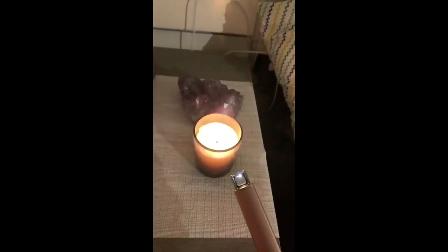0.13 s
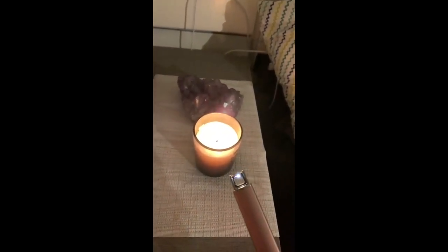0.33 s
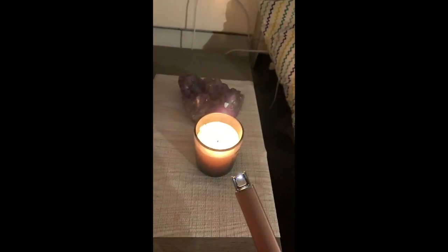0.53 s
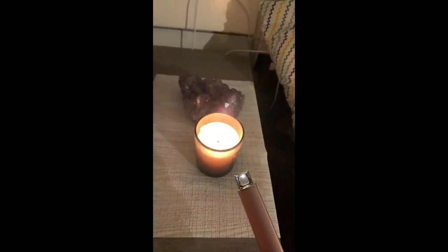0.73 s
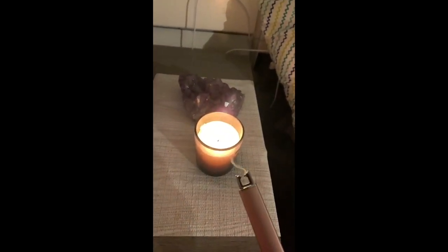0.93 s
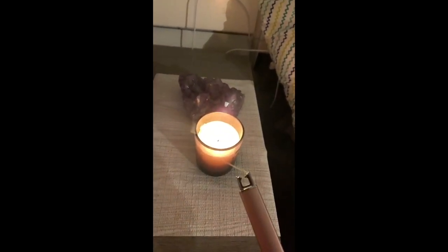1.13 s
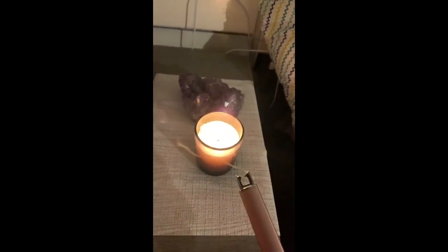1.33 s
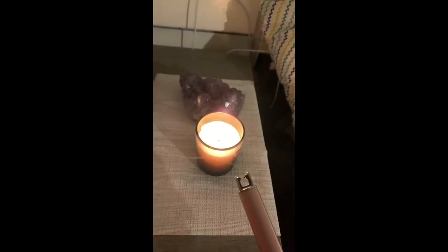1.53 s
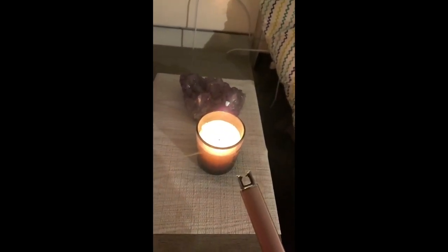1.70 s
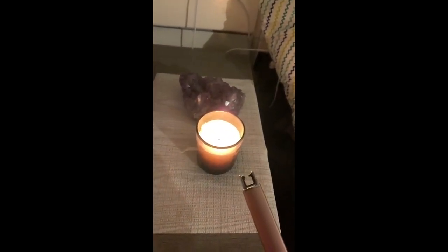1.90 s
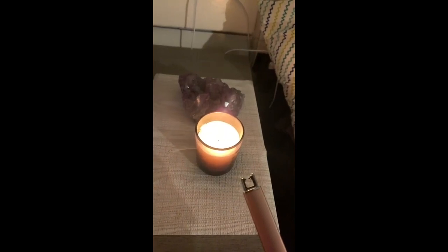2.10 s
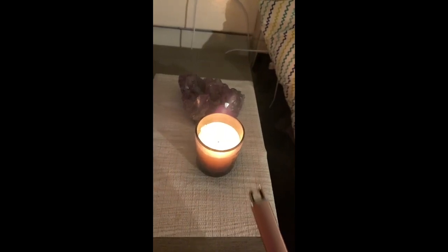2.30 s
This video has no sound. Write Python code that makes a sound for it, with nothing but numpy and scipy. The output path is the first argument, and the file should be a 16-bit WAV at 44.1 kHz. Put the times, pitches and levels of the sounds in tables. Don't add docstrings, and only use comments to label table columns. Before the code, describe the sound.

An electric arc lighter, heard close. Near silence with faint low rumble until a crisp, bright switch click at 0.15 s. The arc strikes at once, stutters weakly, then from 0.25 s spits in irregular crackles, growing stronger and denser from about 0.5 s. At 0.9 s a slightly duller release click cuts it off, with a short, soft small-room tail. Only quiet rumble and faint hum and hiss remain until about 2.4 s.

```python
import sys
import numpy as np
from scipy import signal
from scipy.fft import rfft, irfft, next_fast_len
from scipy.io import wavfile
from scipy.ndimage import uniform_filter1d

SR = 44100
rng = np.random.default_rng(int(sys.argv[2]) if len(sys.argv) > 2 else 0)


def file_out(sig):
    cols = np.atleast_2d(sig).T
    lim = np.clip(cols, -1, 1)
    pcm = np.round(lim * 32767).astype(np.int16)
    wavfile.write(sys.argv[1], SR, pcm)


def nominal_scale(level):
    x = np.asarray(level, float) / 20
    return 10 ** x


N = 103635

# start_s, level_db, spark_rate_khz
ARC_CURRENT = [
    (0.158, -55.5, 6),
    (.19, -57, 6),
    (0.243, -48.5, 6),
    (0.269, -42.5, 4),
    (0.448, -43.5, 3),
    (0.549, -39, 4),
    (0.642, -38.5, 5),
    (0.666, -42.5, 5),
    (.69, -39.5, 5),
    (0.899, -42, 5),
]
# start_s, peak_db
STRIKE_SPARKS = [
    (.1582, -19),
    (.172, -40),
    (.1768, -40),
    (.191, -38),
    (.1952, -40),
    (.1976, -38),
    (.2147, -33),
    (.2153, -29),
    (.2226, -39),
]
# start_s, peak_db, length_s
ARC_JUMPS = [(0.265, -33.5, 0.0098), (0.466, -32, 0.0067), (0.489, -24, 0.0033), (0.533, -25, 0.0034),
             (0.545, -31, 0.015), (0.562, -28.5, 0.0089), (0.6, -67, 0.0028), (0.625, -26, .008),
             (0.671, -29, 0.014), (.693, -26, 0.0028), (.80, -35.5, 0.015)]
# start_s, peak_db, length_s
ARC_SPITS = [(.329, -25, .003), (.3335, -27, .0015), (.3383, -24, .002), (.3468, -26, .0005),
             (.3505, -25, .0012), (.3695, -27, .0012), (.388, -24, .001), (.3915, -29, .0005),
             (.398, -24, .0015), (.4012, -26, .0006), (.417, -25, .0015)]
# frequency_hz, gain_db
SPARK_COLOUR = [(300, -43.5), (1700, -19.5), (2400, -17), (4100, -13), (7500, -8.5), (10000, -4),
                (15900, -1.5), (16300, -29.5)]
# frequency_hz, density_db_per_hz
FIZZ_SPECTRUM = [(100, -34), (200, 3.5), (600, -4), (1500, -13), (4000, -13), (12000, -3)]
# start_s, peak_db, rattle_s, tail_db, tail_t60_s
PRESS_SNAP = [(.1459, -13, .0003, -20, 0.04)]
# start_s, peak_db, rattle_s, tail_db, tail_t60_s
RELEASE_SNAP = [(.8992, -16, .0013, -3.5, 0.01974)]
# pitch_hz, level_db, t60_s
PRESS_HANDLE = [(1550, -26, 0.0072), (3795, -24, 0.013), (5377, -28, 0.0022), (10250, -40, .006),
                (14400, -22, .003)]
# pitch_hz, level_db, t60_s
RELEASE_HANDLE = [(1461, -24.5, 0.002), (2444, -24, 0.0037), (3766, -19.5, .004), (5110, -27, 0.007),
                  (8680, -19, 0.002834), (15740, -24, .01)]
# frequency_hz, gain_db
CLOSING_CRACK = [(300, -60), (1200, -37.5), (2300, -22.5), (3600, 6), (5500, 0), (9000, -5.5),
                 (14000, -6.5), (16500, -28)]
# frequency_hz, gain_db
OPENING_CRACK = [(250, -37), (600, -19.5), (1000, -7), (4500, -6), (6300, -13.5), (9000, -13.5),
                 (14000, -33.5)]
# delay_s, gain_db
NEAR_ECHOES = [(.0002, -17), (.0007, -14), (.00124, -18), (.0018, -20), (.0025, -18)]
# frequency_hz, density_db_per_hz
ROOM_SPECTRUM = [(15, -49.5), (25, -23.5), (73, -1), (175, -21), (240, -22.5), (275, -29.5), (340, -29),
                 (818, -41.5), (14500, -55.5)]
# start_s, level_db
RUMBLE_SWELL = [(0.0, -61), (0.32, -54), (0.35, -83), (0.4, -57.5), (0.63, -54), (1.2, -64), (1.22, -58),
                (1.49, -58.5), (1.52, -54), (1.66, -69.5), (1.69, -55), (1.98, -60), (2.28, -54.5),
                (2.35, -61.5)]
# start_s, gain_db
AIR_STIR = [(0, 1.5), (1.1, -1.5), (2.17, 0.5), (2.26, 3)]
# start_s, top_hz
BAND_TOP = [(0, 14900), (.14, 14900), (.143, 16600), (.165, 16600), (.175, 15800), (.183, 15800),
            (.19, 12500), (.24, 12500), (.26, 13100), (.78, 13100), (.89, 13500), (.905, 14300),
            (.96, 14300), (.98, 14900)]
# start_s, end_s, centre_hz, width_hz
PASSED_BANDS = [
    (.25, .365, 13600, 330),
    (.605, .67, 13760, 70),
    (.875, .94, 15740, 170),
]

SPARK_SCATTER_DB, SPARK_CAP_DB, FLURRY_CAP_DB = 6, 11.5, -6.5
FLICKER_DB, FLICKER_HZ = 0.5, 198.5
FLURRY_DB, STRIKE_DB, FIZZ_DB = -6.5, 6.5, -10
NEAR_DB, NEAR_T60_S = -7.5, .025
HANDLE_CUT_HZ = 764
WALL_DB, WALL_S, WALL_SPREAD_S, WALL_HZ = -24, 0.033, 0.023, 4100
LINGER_DB, LINGER_T60_S, LINGER_HZ = -28, 0.2, 2500
ROOM_DB, HUM_HZ, HUM_DB, SWELL_DB = -60, 240, -79, .5
PORT_CUT_HZ, FRAME = 30, 1024


def arc():
    t = np.arange(N) / SR
    start_s, level_db, rate_khz = np.array(ARC_CURRENT).T
    burning = (t > start_s[0]) & (t < start_s[-1])
    current_db = np.interp(t, start_s, level_db)
    share = np.interp(t, start_s, rate_khz) * 1e3 / SR

    flicker_db = FLICKER_DB * walk(FLICKER_HZ)
    crackle = burning * nominal_scale(current_db + flicker_db) * sparks(share, SPARK_CAP_DB)
    jumps = np.zeros(N)
    for s, db, length in ARC_JUMPS + ARC_SPITS:
        jumps += nominal_scale(db + FLURRY_DB) * (t > s) * np.exp(-((t - s) / length) ** 2)
    discharge = crackle + jumps * sparks(0.054, FLURRY_CAP_DB)
    for s, db in STRIKE_SPARKS:
        discharge[int(s * SR)] += nominal_scale(db + STRIKE_DB) * 2

    discharge = discharge + scattered_hiss(discharge)
    noise = colour(rng.standard_normal(N), FIZZ_SPECTRUM)
    fizz = burning * nominal_scale(current_db / 2 - 24) * level(noise, FIZZ_DB)
    return colour(discharge, SPARK_COLOUR, causal=True) * nominal_scale(6) + fizz


def sparks(share, cap_db):
    size = nominal_scale(np.minimum(SPARK_SCATTER_DB * rng.exponential(size=N), cap_db))
    fires = rng.random(N) < share
    sign = np.sign(rng.standard_normal(N))
    return level(fires * size * sign / np.sqrt(share), 0)


def scattered_hiss(x):
    keep = np.exp(-2 * np.log(1000) / (NEAR_T60_S * SR))
    energy = signal.lfilter([0, 1 - keep], [1, -keep], x ** 2)
    return nominal_scale(NEAR_DB) * np.sqrt(energy) * rng.standard_normal(N)


def snap(event, modes, crack):
    (s, db, length, tail_db, tail_t60), = event
    t = np.arange(3000) / SR
    response = colour(1. * (t == 0), crack, causal=True)
    for hz, gain_db, t60 in modes:
        response += nominal_scale(gain_db) * np.sin(2 * np.pi * hz * t) * 1000. ** (-t / t60)

    burst = np.exp(-(t / length) ** 2)
    tail = nominal_scale(tail_db) * 1000. ** (-t / tail_t60)
    spectrum = rfft(rng.standard_normal(len(t)) * np.hypot(burst, tail))
    spectrum = spectrum / np.sqrt(uniform_filter1d(abs(spectrum) ** 2, size=41))
    rattle = irfft(spectrum, len(t)) * (t < t[-1] / 2)

    x = signal.fftconvolve(response, rattle)[:len(t)]
    high_pass = signal.butter(5, HANDLE_CUT_HZ, "high", fs=SR, output="sos")
    x = signal.sosfilt(high_pass, x)
    out, i = np.zeros(N), int(s * SR)
    out[i:i + len(t)] = x * nominal_scale(db) / abs(x).max()
    return out


def table(x):
    return x + sum(nominal_scale(db) * np.roll(x, round(s * SR)) for s, db in NEAR_ECHOES)


def walls(x):
    t = np.arange(6000) / SR
    wall = rng.standard_normal(len(t)) * np.exp(-((t - WALL_S) / WALL_SPREAD_S) ** 2)
    wall = level(colour(wall, [(WALL_HZ, 0), (15000, -10)]), WALL_DB)
    decay = (t > WALL_S / 2) * np.exp(-np.log(1000) * t / LINGER_T60_S)
    late = rng.standard_normal(len(t)) * decay
    late = level(colour(late, [(LINGER_HZ, 0), (7000, -20)]), LINGER_DB)
    return x + signal.fftconvolve(x, (wall + late) / np.sqrt(len(t)))[:N]


def room():
    t = np.arange(N) / SR
    noise = level(colour(rng.standard_normal(N), ROOM_SPECTRUM), ROOM_DB)
    low = signal.sosfiltfilt(signal.butter(2, 150, fs=SR, output="sos"), noise)
    mid = signal.sosfiltfilt(signal.butter(1, 3000, fs=SR, output="sos"), noise - low)

    hum_hz = HUM_HZ * (1 + 0.0026 * walk(11))
    hum = nominal_scale(HUM_DB) * np.sin(2 * np.pi * np.cumsum(hum_hz) / SR)
    start_s, level_db = np.array(RUMBLE_SWELL).T
    swell = nominal_scale(np.interp(t, start_s, level_db) - level_db.mean())
    stir = nominal_scale(np.interp(t, *np.array(AIR_STIR).T) + SWELL_DB * walk(4))
    return noise + low * (swell - 1) + mid * (stir - 1) + hum


def level(x, db):
    return x * nominal_scale(db) / np.sqrt(np.mean(x ** 2))


def colour(x, points, causal=False):
    size = next_fast_len(len(x) + 4096)
    f = np.fft.rfftfreq(size, 1 / SR)
    hz, db = np.array(points).T
    log_gain = np.interp(np.log(f + 1), np.log(hz), db) * np.log(10) / 20
    if causal:
        cepstrum = irfft(log_gain, size)
        cepstrum[1:size // 2] *= 2
        cepstrum[size // 2 + 1:] = 0
        log_gain = rfft(cepstrum)
    return irfft(rfft(x, size) * np.exp(log_gain), size)[:len(x)]


def walk(hz):
    hold = max(int(SR / hz), 1)
    steps = rng.standard_normal(N)[np.arange(N) // hold]
    return uniform_filter1d(steps, hold) * np.sqrt(2)


def scene():
    press = snap(PRESS_SNAP, PRESS_HANDLE, CLOSING_CRACK)
    release = snap(RELEASE_SNAP, RELEASE_HANDLE, OPENING_CRACK)
    return (walls(table(arc()) + press + release) + room())[None]


def low_pass(x):
    return signal.sosfilt(signal.butter(12, 16800, fs=SR, output="sos"), x)


def record(dry):
    high_pass = signal.butter(3, PORT_CUT_HZ, "high", fs=SR, output="sos")
    x = signal.sosfilt(high_pass, dry[0])
    f, t, z = signal.stft(x, SR, nperseg=FRAME, noverlap=FRAME * 3 // 4)
    keep = f[:, None] < np.interp(t, *np.array(BAND_TOP).T)
    for start, end, hz, width in PASSED_BANDS:
        keep |= (abs(f - hz) < width / 2)[:, None] & (t > start) & (t < end)
    x = signal.istft(z * keep, SR, nperseg=FRAME, noverlap=FRAME * 3 // 4)[1][:N]
    return low_pass(x[None])


dry = scene()
out = record(dry)
file_out(out)
```